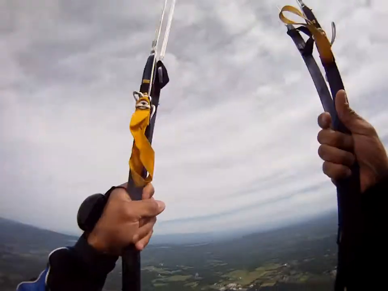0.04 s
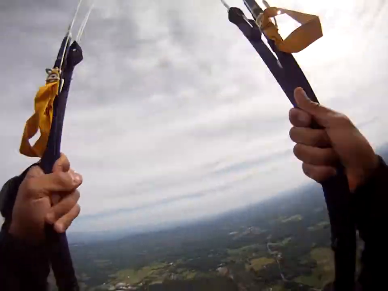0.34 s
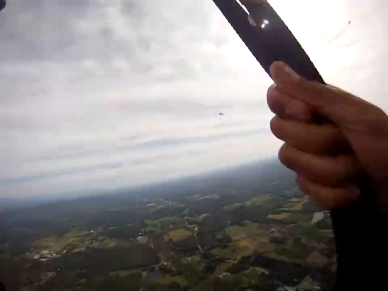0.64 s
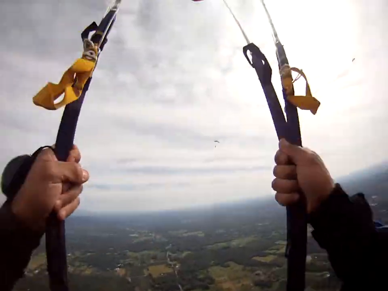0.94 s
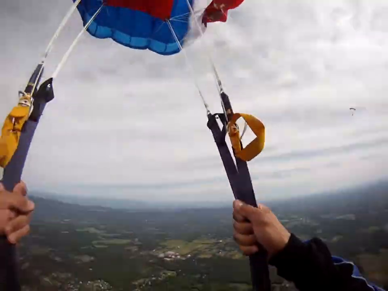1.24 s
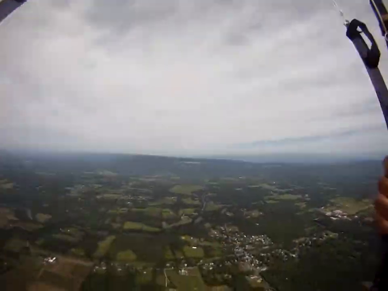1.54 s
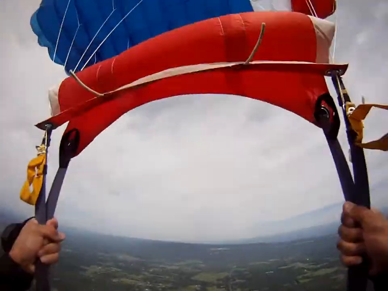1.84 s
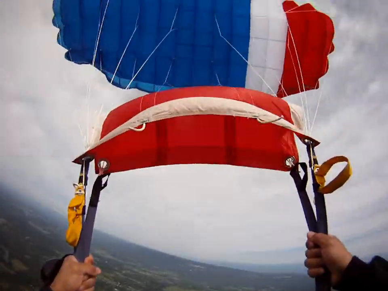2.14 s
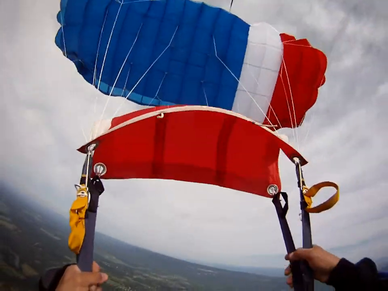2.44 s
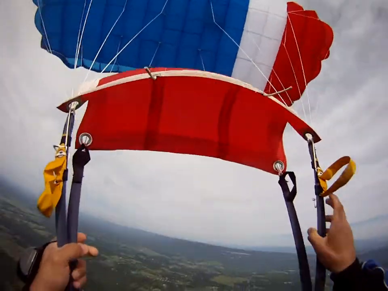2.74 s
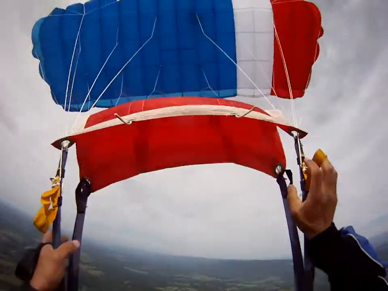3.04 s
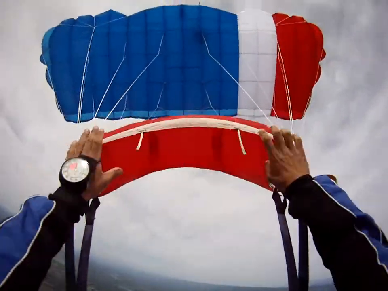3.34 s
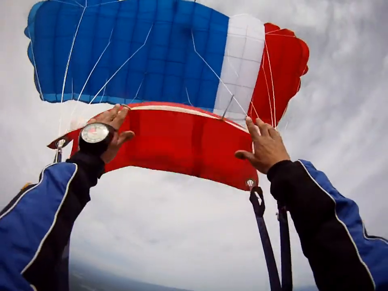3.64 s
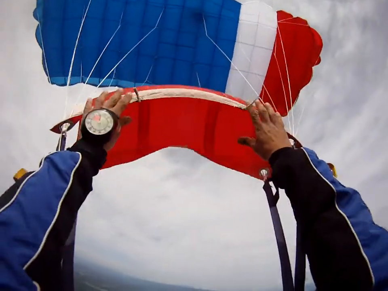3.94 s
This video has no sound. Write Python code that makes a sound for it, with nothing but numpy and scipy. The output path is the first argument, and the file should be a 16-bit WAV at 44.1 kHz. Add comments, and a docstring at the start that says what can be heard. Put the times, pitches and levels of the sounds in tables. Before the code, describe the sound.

A parachute opens, heard through a closed plastic camera case. For the first second, loud gusts rumble and rush while cloth crackles and straps knock and thump, the hardest hit overloading the microphone at about 1.1 seconds. Flapping continues, with another knock near 1.6. From about 2 seconds the rush drops to a soft, wavering gliding wind, with a sharp fabric scuff at 3.2 and a softer one near 3.7.

```python
"""A parachute opens.

It is heard from inside a closed plastic camera case on the jumper's helmet. Air buffets the case, and the
flapping canopy rustles and crackles through it. Straps and hardware knock on it and overload the
microphone. Once the canopy is full, the rush drops to a soft glide with scuffs of fabric."""
import sys
import numpy as np
from scipy import signal
from scipy.fft import rfft, irfft
from scipy.io import wavfile
from scipy.ndimage import uniform_filter1d

SR = 44100
rng = np.random.default_rng(int(sys.argv[2]) if len(sys.argv) > 2 else 0)


def pcm_store(signal):
    """Save signal as 16-bit PCM."""
    levels = np.round(np.clip(np.atleast_2d(signal), -1, 1) * 32767)
    wavfile.write(sys.argv[1], SR, levels.astype(np.int16).T)


N = 4 * SR

# How loud each layer of wind is over time: time_s, level_db
BUFFET_LEVELS = [(0, -18), (.2, -20), (.35, -18.5), (.52, -20.5), (.57, -35.5), (.73, -21), (.87, -34.5),
                 (1.08, -23.5), (1.15, -30.5), (1.6, -32.5), (1.9, -38), (2.45, -41), (2.62, -34.5),
                 (2.8, -38.5), (3.6, -34), (3.74, -28.5), (3.9, -35.5), (4, -37.5)]  # low rumble of swirling air
RUSH_LEVELS = [(0, -30.5), (.09, -34), (.12, -40.5), (.2, -34.5), (.5, -35.5), (.535, -48), (.56, -51),
               (.64, -48), (.72, -30), (.765, -52), (.83, -49), (.88, -40), (.97, -43), (1.09, -33.5),
               (1.12, -43), (1.2, -36.5), (1.36, -37), (1.56, -38), (1.84, -38.5), (2.04, -49),
               (2.08, -50.5), (2.5, -56.5), (3.5, -55), (4, -56)]  # rushing air and fluttering cloth
ROAR_LEVELS = [(0, -24.5), (.09, -26), (.125, -35.5), (.19, -26), (.26, -31), (.32, -21), (.46, -33),
               (.53, -21), (.56, -50.5), (.67, -39.5), (.72, -31), (.78, -47), (1.0, -51.5), (1.08, -27.5),
               (1.14, -64), (1.28, -32.5), (1.36, -43), (1.8, -45.5), (2.1, -59), (4, -74)]  # fast air, gone once the fall is braked
GLIDE_LEVELS = [(0, -59), (2.2, -48.5), (2.6, -44.5), (3.1, -49), (3.45, -44), (3.8, -41), (4, -38.5)]  # soft gliding wind

# The tone colour of each noise, from low to high: pitch_hz, level_db
BUFFET_COLOUR = [(11, 13), (18, -6.5), (81, 3.5), (102, -0.5), (129, -12), (199, -21), (260, -20.5),
                 (340, -30), (570, -120)]
RUSH_COLOUR = [(250, -5.5), (600, -5), (1100, -7), (2000, -2.5), (3500, -3), (4500, -11), (6500, -10),
               (8500, -17), (12000, -15.5), (15500, -24.5)]
ROAR_COLOUR = [(50, -34), (90, 3), (160, 3), (250, 0), (450, -6.5), (650, -7), (950, -5.5), (1250, -14.5),
               (1900, -10), (3000, -25), (4500, -34), (7000, -50), (11500, -16), (15000, -37)]
GLIDE_COLOUR = [(100, -24.5), (220, -8.5), (350, 2.5), (620, -7.5), (790, -6), (970, -6.5), (1200, -14),
                (1700, -13.5), (2300, -12), (4000, -34), (6500, -35.5), (9000, -33.5), (15000, -29.5)]
CRACK_COLOUR = [(300, 4), (700, 0), (1200, -16), (2300, -2), (3500, 1), (4200, -15.5), (7000, -19),
                (9000, -12.5), (13000, -25.5), (15500, -24)]
CLOTH_COLOUR = [(400, -10.5), (700, -11), (1100, -10), (2300, -1.5), (3500, -7), (4200, -16.5),
                (7000, -21.5), (9000, -15), (15500, -20.5)]

# Pitches that the case boosts or muffles: pitch_hz, width_hz, boost_db
CASE_PEAKS = [(744, 34, 6), (983, 137, 9), (1440, 90, 9.5), (2342, 595, 10.5), (2900, 460, -4.5),
              (3430, 240, 3), (4770, 180, 3.5), (6050, 790, -18), (8570, 280, 10.5), (9720, 750, 12.5),
              (11010, 120, 7), (11840, 1340, -21), (11800, 45, 8), (12077, 45, 8), (13000, 130, 13),
              (14430, 560, 17.5), (15040, 160, -3)]  # for fast air, cracks and snaps
GLIDE_PEAKS = [(780, 87, 11), (968, 61, 7), (2300, 430, -5.5), (6020, 500, -18), (9650, 460, 9.5),
               (11100, 120, 16), (11600, 770, 1), (12964, 130, 10), (13900, 330, -7)]  # for slow air
SCUFF_PEAKS = [(950, 280, 17.5), (1260, 200, 6), (2364, 210, 12.5), (2950, 280, -7), (3370, 370, 6),
               (4470, 160, 5.5), (6020, 630, -6.5), (8580, 350, 6.5), (9590, 460, 13), (10860, 120, 10),
               (11760, 1200, -20), (12964, 130, 4), (14340, 400, 15)]  # for cloth rubbing nearby

# Tones of the struck case: pitch_hz, level_db, ring_s (time to fade by 60 dB)
CASE_TONES = [(521, 3.5, 0.012), (735, 5.5, 0.0076), (947, 6, 0.014), (1240, 5, 0.0076), (1510, 8, 0.0074),
              (1770, 3, 0.0065), (2414, -3, 0.016), (3176, 3, 0.014)]  # the main ring
PING_TONES = [(7235, -8, .008), (8700, -5, .008), (9590, -4, .008), (11035, 0, .016), (11924, -13, .035),
              (12077, -12, .035), (12964, -2, .016), (13600, -3, .006), (14408, -2, .010)]  # thin, high pings

# Straps and hardware hitting the case: start_s, level_db, contact_hz, crack_db (relative to the ring)
KNOCKS = [(.1008, 5.5, 990, -11), (.4882, -2.5, 880, -17), (.4985, -8.5, 900, -35), (.5184, 5, 2310, -9.5),
          (.5368, 0, 620, -13), (.7136, -3, 1070, -16), (.7254, -3.5, 965, -13), (.7497, 2, 745, -12),
          (.8038, -11, 1060, -11), (.8502, -3, 1140, -16), (.9308, -13.5, 1590, -18),
          (.9330, -7.5, 1430, -17), (1.1021, 15, 1890, -15.5), (1.6148, -16.5, 885, -27),
          (1.6205, -1, 885, -9.5), (1.6352, -15.5, 810, -18), (1.6465, -17, 400, -30),
          (1.8025, -17.5, 1040, -18)]
# Flaps and rubs of fabric: peak_s, level_db, rise_s, fade_s
SCUFFS = [(.191, -18, 0.0023, 0.0018), (0.342, -19.5, 0.00086, 0.0033), (0.437, -21.5, 0.0037, 0.014),
          (0.935, -21.5, 0.014, 0.0058), (1.083, -28, 0.014, 0.015), (1.182, -25.5, 0.022, 0.017),
          (1.337, -25.5, 0.054, 0.017), (1.471, -31.5, 0.003, 0.012), (1.497, -29, 0.003, 0.0088),
          (1.804, -25, 0.001, 0.0045), (1.836, -32, 0.0036, 0.0067), (1.892, -29, 0.0013, 0.0066),
          (1.964, -41, 0.0013, 0.0048), (2.007, -33, 0.02, 0.0074), (2.051, -28.5, 0.0039, 0.0089),
          (2.24, -48, 0.0037, .008), (2.445, -46, 0.0092, 0.015), (2.95, -44.5, 0.036, 0.052),
          (3.216, -34, 0.0026, 0.005), (3.2403, -13, 0.0021, 0.0039), (3.255, -30, 0.0021, 0.01),
          (3.700, -26.5, 0.013, 0.012)]
# Shoves of air and straps: start_s, level_db, length_s, direction (+1 push, -1 suction)
JOLTS = [(0.3386, -1.5, 0.0058, 1), (0.4335, -6.5, 0.0046, 1), (.5020, -9, 0.0056, 1),
         (0.5363, 3, .005, -1), (0.726, -6.5, 0.0096, -1), (0.7482, 2, 0.00474, -1),
         (0.8021, -10.5, 0.0058, -1), (.8503, -17.5, 0.0019, 1), (0.9358, -6, .010, 1),
         (0.9443, -4.5, 0.0076, -1), (1.267, -15, 0.0103, -1), (1.6215, -14, 0.0016, -1),
         (1.627, -7, 0.0093, 1), (1.6491, -6, 0.0089, 1), (1.663, -11, 0.014, 1), (3.72, -16.5, 0.012, 1),
         (3.775, -16, 0.0089, 1)]


def gain(db):
    """Turn decibels into a number to multiply by."""
    return 10 ** (np.asarray(db) / 20)


def loudness(levels):
    """Join time_s, level_db points into a gain for every sample."""
    return gain(np.interp(np.arange(N) / SR, *np.array(levels).T))


def noise(colour, peaks=()):
    """Noise of average strength 1, shaped by a tone colour and any peaks."""
    hz, db = np.array(colour).T
    f = np.maximum(np.fft.rfftfreq(N, 1 / SR), 1)
    colour_db = np.interp(np.log(f), np.log(hz), db)
    peaks_db = sum(boost / (1 + (2 * (f - pitch) / width) ** 2) for pitch, width, boost in peaks)
    edge_fade = np.minimum(f / hz[0], 1) ** 2 * np.minimum(hz[-1] / f, 1) ** 2
    sound = irfft(rfft(rng.standard_normal(N)) * gain(colour_db + peaks_db) * edge_fade, N)
    return sound / sound.std()


def wobble(rate_hz):
    """A smooth random drift of typical size 1, changing about rate_hz times a second."""
    hold = max(int(SR / rate_hz), 1)
    steps = np.repeat(rng.standard_normal(N)[:N // hold + 1], hold)
    drift = uniform_filter1d(steps, hold)[:N]
    return drift / drift.std()


def ring(tones, t):
    """One fading sine wave for each tone."""
    hz, db, ring_s = np.array(tones).T[:, :, None]
    return gain(db) * np.sin(2 * np.pi * hz * t) * np.exp(-np.log(1000) * t / ring_s)


def add(out, start_s, sound):
    """Mix a sound in at its start time."""
    i = int(start_s * SR)
    out[i:i + len(sound)] += sound[:N - i]


def fast_wind(buffet_db=2.5, rush_db=3, flutter_db=1, grain_db=1.5, swirl_db=2.12):
    """Swirls of air buffet the case and make the rush swell and dip, while the cloth makes it flutter."""
    swirls = noise(BUFFET_COLOUR)
    buffet = swirls * loudness(BUFFET_LEVELS) * gain(buffet_db)
    flutter = gain(flutter_db * wobble(rate_hz=27.85) + grain_db * wobble(rate_hz=301) + swirl_db * swirls)
    flutter /= np.sqrt(np.mean(flutter ** 2))  # keep the average power unchanged
    rush = noise(RUSH_COLOUR, CASE_PEAKS) * loudness(RUSH_LEVELS) * gain(rush_db)
    roar = noise(ROAR_COLOUR, CASE_PEAKS) * loudness(ROAR_LEVELS)
    return buffet + flutter * (rush + roar)


def glide_wind(waver_db=4.2):
    """Slow air flows past the case as a soft, wavering wind."""
    air = noise(GLIDE_COLOUR, GLIDE_PEAKS)
    return air * loudness(GLIDE_LEVELS) * gain(waver_db * wobble(rate_hz=18))


def crackle(snaps_per_s=16, fade_s=0.0025, relative_db=-8):
    """Flapping cloth gives small snaps at random moments; their loudness follows the rush."""
    snaps = (rng.random(N) < snaps_per_s / SR) * rng.uniform(0.44, 1.6, N)
    fading = signal.lfilter([1], [1, -np.exp(-1 / (fade_s * SR))], snaps)
    return gain(relative_db) * loudness(RUSH_LEVELS) * fading * noise(CLOTH_COLOUR, CASE_PEAKS)


def knocks(contact_s=0.00069, spread_octaves=0.38, crack_rise_s=0.00017, crack_fade_s=0.0023):
    """Each hit makes the case crack, ping and ring; harder contacts favour the higher tones."""
    out, t = np.zeros(N), np.arange(SR // 20) / SR
    hz = np.array(CASE_TONES)[:, 0]
    wall_motion = ring(CASE_TONES, t) * (1 - np.exp(-t / contact_s))
    # The speed of the case wall makes the sound.
    rings = np.gradient(wall_motion, 1 / SR, axis=1) / (2 * np.pi * hz[:, None])
    # Each knock lands somewhere else and brings out different pings.
    ping_db = rng.normal(-10, 2.5, (len(KNOCKS), len(PING_TONES)))
    pings = gain(ping_db) @ ring(PING_TONES, t)
    hiss = noise(CRACK_COLOUR, CASE_PEAKS)
    for k, (start_s, level_db, contact_hz, crack_db) in enumerate(KNOCKS):
        shares = 1 / (1 + (np.log2(hz / contact_hz) / spread_octaves) ** 2)  # largest near contact_hz
        body = shares @ rings / np.linalg.norm(shares)
        crack = hiss[k * len(t):(k + 1) * len(t)] * np.exp(-t / crack_fade_s)
        burst = (crack + pings[k]) * (1 - np.exp(-t / crack_rise_s))
        add(out, start_s, gain(level_db) * (gain(crack_db) * burst - body))
    return out


def scuffs(grain_db=1.2):
    """Fabric flaps and rubs in short, grainy bursts, coloured by the case."""
    t = np.arange(N) / SR
    swell = sum(gain(level_db) * np.exp(-np.maximum((peak_s - t) / rise_s, (t - peak_s) / fade_s))
                for peak_s, level_db, rise_s, fade_s in SCUFFS)
    return swell * noise(CLOTH_COLOUR, SCUFF_PEAKS) * gain(grain_db * wobble(rate_hz=900))


def jolts(pitch_hz=59.3, width_hz=61.6):
    """A short push or pull of pressure swings back and dies away as a low thump."""
    pushes, t = np.zeros(N), np.arange(SR // 20) / SR
    for start_s, level_db, length_s, direction in JOLTS:
        pulse = np.sin(np.pi * np.minimum(t / length_s, 1))
        add(pushes, start_s, direction * gain(level_db) * pulse)
    swing = signal.bilinear([1, 0, 0], [1, 2 * np.pi * width_hz, (2 * np.pi * pitch_hz) ** 2], SR)
    return signal.lfilter(*swing, pushes)


def scene():
    """Everything reaches one microphone inside the case, and both channels carry it."""
    mono = fast_wind() + glide_wind() + knocks() + scuffs() + jolts() + crackle()
    return np.array([mono, mono])


def record(dry):
    """The overloaded microphone flattens the loudest peaks, and the highest treble is cut."""
    ceiling, hardness, top_hz = 0.92, 30, 15300
    clipped = dry / (1 + np.abs(dry / ceiling) ** hardness) ** (1 / hardness)
    treble_cut = signal.ellip(8, .2, 70, top_hz, fs=SR, output="sos")
    return signal.sosfilt(treble_cut, clipped)


dry = scene()
out = record(dry)
pcm_store(out)
```